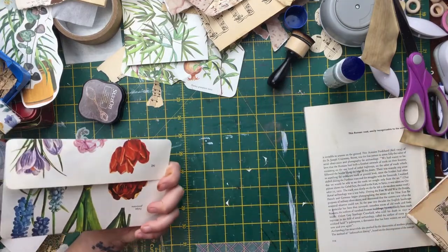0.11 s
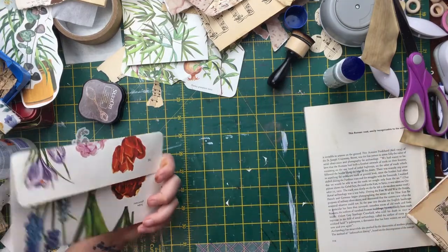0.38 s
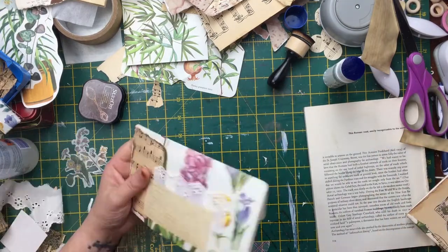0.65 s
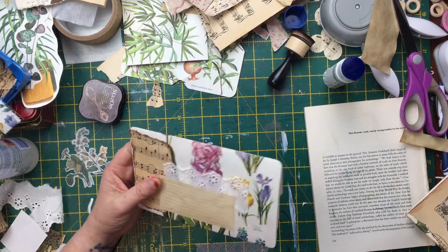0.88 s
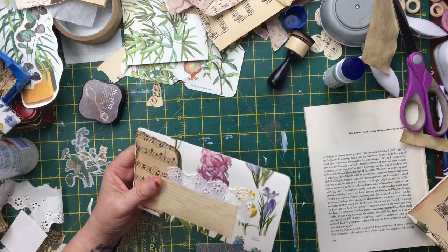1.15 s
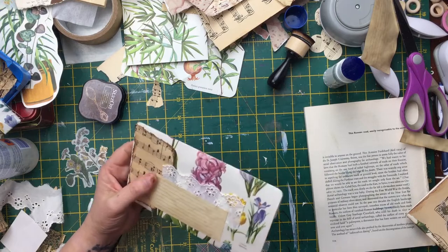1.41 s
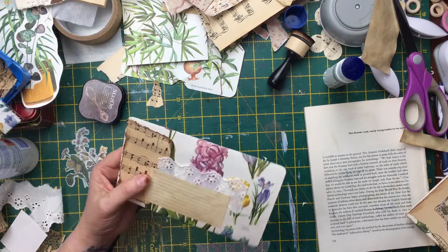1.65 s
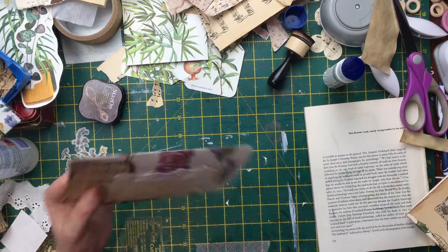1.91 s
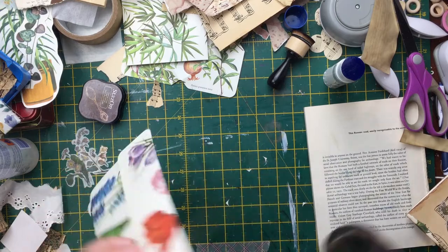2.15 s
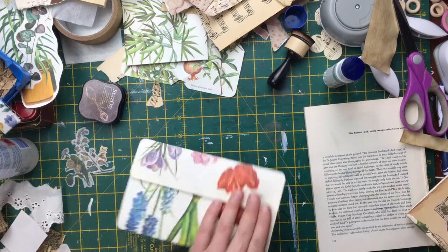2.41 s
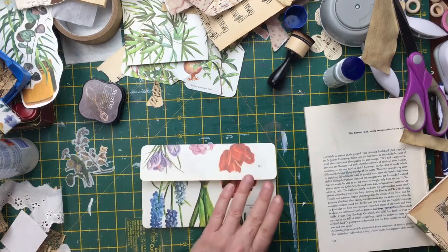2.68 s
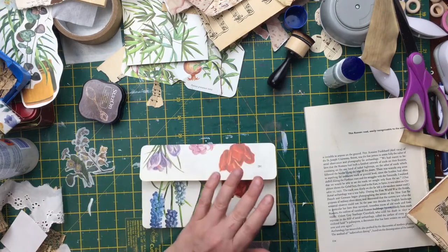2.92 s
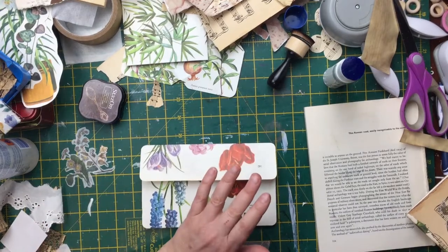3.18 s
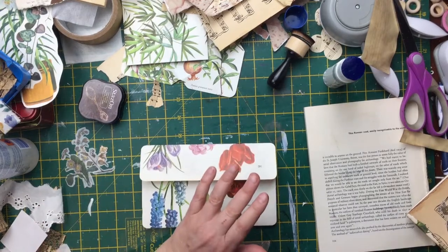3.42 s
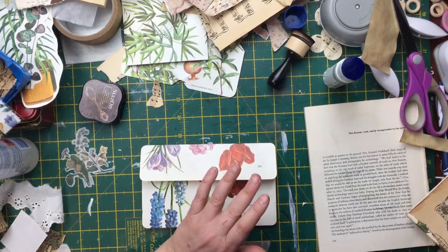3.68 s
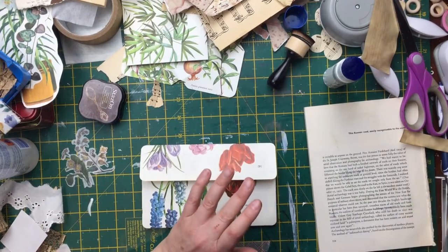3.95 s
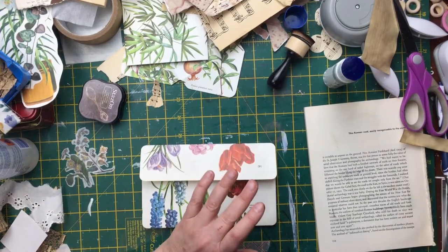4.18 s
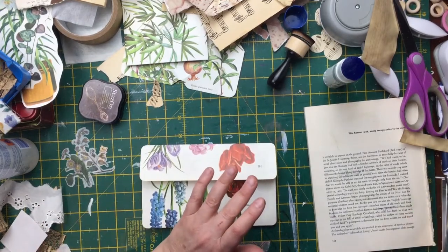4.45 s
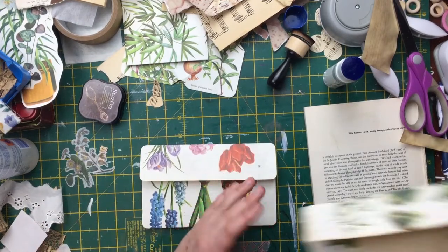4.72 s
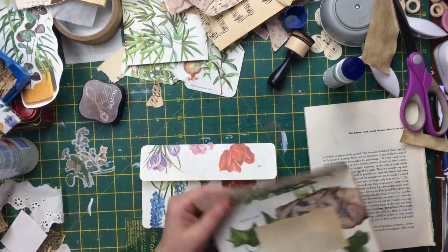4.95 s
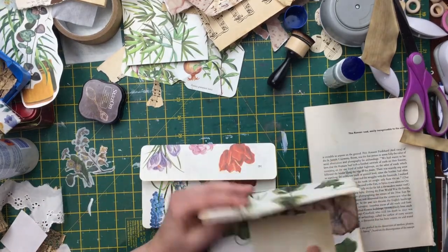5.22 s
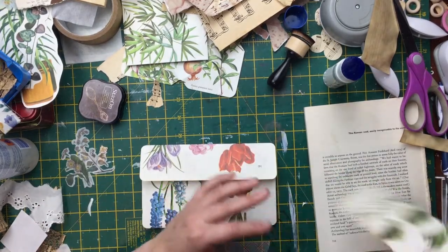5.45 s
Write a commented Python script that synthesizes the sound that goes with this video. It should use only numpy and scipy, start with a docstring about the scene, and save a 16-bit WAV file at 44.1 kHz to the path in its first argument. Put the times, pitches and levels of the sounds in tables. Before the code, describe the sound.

Close, soft rustles and dull pats of stiff card, a sharp table knock with faint clinking, then papery slaps and brisk shuffling.

```python
"""Quiet room air and a wavering mains hum, then stiff paper envelopes turned, laid down and picked up.
The microphone is just above a table with a cutting mat: sliding paper is shaped noise, snaps ring the sheet.
A hard object knocks on the table top, pushing its modes, and small metal parts clink as decaying modes.
Close sounds lose their highest treble and leave a short diffuse room tail."""
import sys
import numpy as np
from scipy import signal
from scipy.fft import rfft, irfft, next_fast_len
from scipy.io import wavfile
from scipy.ndimage import uniform_filter1d

SR = 44100
rng = np.random.default_rng(int(sys.argv[2]) if len(sys.argv) > 2 else 0)


def dump(signal):
    """Clip the signal to [-1, 1] and save it as 16-bit WAV at the path in sys.argv[1]."""
    limited = np.clip(np.atleast_2d(signal).T, -1, 1)
    pcm = np.round(limited * 32767).astype(np.int16)
    wavfile.write(sys.argv[1], SR, pcm)


def how_loud(loudness_db):
    """Turn decibels into a plain amplitude multiplier (0 dB gives 1, 20 dB gives 10)."""
    steps = np.asarray(loudness_db, float) / 20
    return 10 ** steps


N = 246519  # samples
T = np.arange(N) / SR  # seconds


def level(x, db):
    """Scale to an rms level in dB."""
    return x * how_loud(db) / np.sqrt(np.mean(x ** 2))


def band(x, hz, q):
    """Resonant band-pass, gain 1 at the centre."""
    return signal.lfilter(*signal.iirpeak(hz, q, fs=SR), x)


def steep(x, hz, q):
    """The same resonance twice, for steeper sides."""
    return band(band(x, hz, q), hz, q)


def lowpass(x, order, hz):
    """Butterworth treble roll-off."""
    return signal.lfilter(*signal.butter(order, hz, fs=SR), x)


def decay(t, t60):
    """Exponential fade, 60 dB down after t60 seconds."""
    return np.exp(-np.log(1000) * t / t60)


def linger(x, seconds):
    """Let each push die away exponentially with this time constant."""
    return signal.lfilter([1], [1, -np.exp(-1 / (seconds * SR))], x)


def ring(push, hz, t60):
    """One decaying mode, set off by a push."""
    pole = np.exp((2j * np.pi * hz - np.log(1000) / t60) / SR)
    return signal.lfilter([1], [1, -pole], push).imag


def walk(rate):
    """Random levels held 1 / rate seconds and slewed twice; spread near 1."""
    hold = int(SR / rate)
    steps = np.repeat(rng.standard_normal(N // hold + 1), hold)
    return 2.17 * uniform_filter1d(uniform_filter1d(steps, hold), hold)[:N]


def grit(per_s, spread_db):
    """Noise roughened by fibres catching: many tiny clicks, a few of them larger."""
    size = how_loud(spread_db * np.minimum(rng.exponential(size=N), 3))
    clicks = (rng.random(N) < per_s / SR) * size
    return level(rng.standard_normal(N) * (1 + 15 * uniform_filter1d(clicks, size=60)), 0)


# Colour of the room air and microphone hiss. Each row: frequency in Hz, relative density in dB per Hz.
AIR_COLOUR = [(12, -23.5), (20, 5.5), (123, -9), (141, -11.5), (176, -10), (208, -12), (316, -13),
              (344, -17.5), (467, -20), (1240, -26.5), (1430, -27.5), (2860, -33), (15700, -39)]
AIR_DB, HUM_DB, HUM_HZ = -64, -71.5, 119.4  # rms levels; the hum wavers around its own


def air():
    """Steady coloured noise under a hum that wavers in level and phase."""
    size = next_fast_len(N)
    hz, db = np.transpose(AIR_COLOUR)
    bins_hz = np.arange(size // 2 + 1) * SR / size
    colour = how_loud(np.interp(np.log(bins_hz + 1), np.log(hz), db))
    noise = irfft(rfft(rng.standard_normal(size)) * colour, size)[:N]
    hum_level = np.sqrt(2) * how_loud(HUM_DB + 1.3 * walk(12))
    hum = hum_level * np.sin(2 * np.pi * HUM_HZ * T + 0.78 * walk(14))
    return level(noise, AIR_DB) + hum


# How fast the room falls silent. Each row: frequency in Hz, t60 in seconds.
ROOM_DECAY = [(125, 0.3315), (500, 0.569), (2000, 0.43), (8000, 0.32)]
ROOM_DB = -20.5  # energy of the tail's impulse response


def room(x):
    """Diffuse noise tail, each octave fading at its own pace."""
    t, (hz, t60) = T[:SR // 2], np.transpose(ROOM_DECAY)
    tail = 0
    for centre in 90 * 2 ** np.arange(8):
        octave_t60 = np.interp(np.log(centre), np.log(hz), t60)
        tail = tail + band(rng.standard_normal(len(t)), centre, 2.7) * decay(t, octave_t60)
    tail = tail * np.clip(t / 0.0075, 0, 1)  # first reflections need a few ms
    return signal.fftconvolve(x, how_loud(ROOM_DB) * tail / np.sqrt(np.sum(tail ** 2)))[:N]


# Blows on the table, which also shake the metal. Each row: start in seconds, relative push on the table in dB,
# contact in ms, lowest frequency in Hz the object's weight can move, relative push on the metal in dB.
BLOWS = [(3.038, -12.5, 0.58, 50.7, -93), (3.197, -47, 1, 303, -99), (3.252, -72, 0.53, 300, -68),
         (3.2619, -29, 1, 252, -34.5), (3.268, -29.5, 1.2, 245, -45), (3.273, -37, 0.95, 250, -72),
         (3.281, -46, 1.48, 250, -78.5), (3.3778, -24, 2.83, 149, -58.5), (3.392, -26.5, 1.62, 298, -87.5),
         (3.397, -32, 1.12, 304, -95), (3.411, -29, 2.1, 300, -95), (3.4276, -22.5, 1.1, 336, -32),
         (3.44, -24.5, 1.1, 343, -35), (3.461, -35, 2, 300, -36.5), (3.502, -43.5, 0.36, 300, -44),
         (3.508, -36, 0.89, 296, -46.5), (3.641, -49, 0.82, 350, -90)]
# Distinct modes of the table top. Each row: frequency in Hz, relative level in dB, t60 in seconds.
TABLE_MODES = [(84.7, -29.5, 0.15), (134.7, -16.5, 0.288), (187.43, -24, 0.22), (288, -8.5, 0.094),
               (396.3, -24.5, 0.092), (542.4, -7.5, 0.12), (616, -1, 0.098), (662, -9, 0.1312),
               (822, -3, 0.033), (980, -2, 0.017), (1220, -2.5, 0.024), (1510, 6.5, 0.016),
               (1618, -17.5, 0.0552), (1940, -12, 0.0359), (2400, -12.5, 0.026)]
# Its dense small modes, by octave. Each row: centre in Hz, relative level in dB, t60 in seconds.
DENSE_MODES = [(44.2, -5, 0.1486), (89, -4.5, 0.21), (186.7, -8, 0.36), (345, 1, 0.26), (670.8, 6.5, 0.21),
               (1410, -11, 0.2564), (2880, -16.5, 0.136), (5760, -21, 0.078)]


def table():
    """Rounded pushes: a long contact leaves out the upper modes; each moves little below its lowest frequency."""
    push, t = np.zeros(N), T[:SR // 2]
    for start, db, contact_ms, lowest_hz, _ in BLOWS:
        # start between samples; the push peaks a third of the way into the contact
        phase = np.clip(T[:4000] - start % (1 / SR), 0, 1) / (contact_ms / 6000)
        shape = phase ** 2 * np.exp(-phase)
        shape = signal.lfilter(*signal.butter(2, lowest_hz, "high", fs=SR), shape / shape.sum())
        at = int(start * SR)
        push[at:at + 4000] -= how_loud(db) * shape
    modes = sum(how_loud(db) * ring(push, hz, t60) for hz, db, t60 in TABLE_MODES)
    response = 0
    for hz, db, t60 in DENSE_MODES:
        octave = level(steep(rng.standard_normal(len(t)), hz, 1.0), 0)
        response = response + how_loud(db) * octave * decay(t, t60)
    dense = signal.fftconvolve(push, response * np.clip(t / 0.0026, 0, 1))[:N]
    # the surfaces tick as they meet
    tick = steep(linger(abs(push), .003) * rng.standard_normal(N), 6840, 0.68)
    thud = steep(push, 600, 2.33)
    return how_loud(-39.5) * tick + how_loud(-4) * modes + how_loud(-18) * dense + how_loud(23) * thud


# Modes of the small metal parts. Each row: frequency in Hz, relative level in dB, t60 in seconds.
METAL_MODES = [(1452, -18, .3), (1905, -16, .2), (2373, -8, 0.047), (3265, -14.5, 0.35), (3464, -14, 0.38),
               (3450, -9.5, 0.37), (3715, -5, 0.054), (4066, -15, 0.426), (4540, -25, .15),
               (4865, -6.5, 0.23), (4960, -0.5, 0.16), (5830, -6.5, .14), (5800, -10, 0.32),
               (6393, -6, 0.14), (6126, -3, 0.21), (6450, 0.5, 0.16), (6370, -6, 0.11), (6997, -10, 0.19),
               (7590, -11, 0.093), (8350, -6.5, 0.187), (9400, -6.5, .13), (9430, -11, 0.11),
               (9890, -9, .12), (10280, -2, 0.052), (10570, -7, 0.081), (11500, -20.5, 0.12),
               (12020, -1.5, .08), (13440, -20.5, .14), (14300, -18, 0.11), (15320, -20, .16)]
TWIN = 1.003  # frequency ratio of each mode's fast-dying twin


def metal():
    """Every clink lands elsewhere, so the modes share its energy anew; loose parts chatter on for a moment."""
    start = int(BLOWS[0][0] * SR)
    at = [int(row[0] * SR) - start for row in BLOWS]
    size = how_loud(np.array(BLOWS)[:, -1])
    share = rng.standard_normal((len(BLOWS), len(METAL_MODES)))
    push = np.zeros(SR)  # one second from the first blow
    push[at] = size
    chatter = linger(push, 0.013) * (rng.random(SR) < 1800 / SR)
    clinks = 0
    for k, (hz, db, t60) in enumerate(METAL_MODES):
        hits = how_loud(-6) * chatter * rng.standard_normal(SR)
        hits[at] = size * how_loud(4.3 * share[:, k])
        clinks = clinks + how_loud(db - 22.5) * ring(hits, hz, t60)
        # most of the energy dies fast where the pieces touch
        clinks = clinks + how_loud(db - 11.5) * ring(hits, hz * TWIN, t60 * 0.32)
    crack = steep(linger(push, 0.004) * rng.standard_normal(SR), 6500, 0.61)
    rattle = steep(chatter * rng.standard_normal(SR), 6000, 0.5)
    clatter = lowpass(how_loud(-0.5) * crack + how_loud(-15) * rattle, 4, 11500)
    return np.pad(clinks + clatter, (start, N - start - SR))


# Strokes of paper sliding on fingers and mat. Each row: start in seconds, length in seconds,
# relative hiss level in dB, centre of the hiss in Hz, relative level of the sheet's flexing in dB.
STROKES = [(0.376, 0.36, -62, 7800, -70.5), (0.707, 0.036, -60, 5630, -63), (0.735, .11, -66.5, 7900, -68),
           (1.153, .14, -78, 5836, -92.5), (1.33, 0.26, -72.5, 5540, -79), (1.556, 0.23, -68, 5720, -74),
           (1.74, 0.0984, -67.5, 7200, -73), (1.899, .15, -69, 6240, -72), (2.016, .14, -64.5, 7950, -71.5),
           (2.156, 0.132, -67.5, 7200, -73.5), (2.291, 0.056, -67.5, 6860, -83),
           (2.346, 0.27, -71, 4160, -75.5), (2.552, 0.0609, -59, 7620, -53),
           (2.626, 0.045, -72, 6600, -61.5), (3.678, 0.078, -76, 6600, -64),
           (3.725, 0.14, -63.5, 8300, -58), (3.848, .04, -62, 9000, -59.5),
           (3.866, 0.1503, -57.5, 6900, -55.5), (4.001, 0.1082, -63, 5560, -55.5),
           (4.282, 0.19, -72, 7230, -70.5), (4.889, 0.064, -57.5, 8120, -60), (4.986, .1, -61.5, 6250, -69),
           (5.084, 0.075, -70, 5200, -69), (5.153, .08, -67.5, 5930, -62.5),
           (5.222, 0.1, -61.5, 7500, -61.5), (5.289, .1, -55.5, 7700, -60.5), (5.381, .07, -65, 7500, -67),
           (5.424, .07, -63.5, 6600, -58), (5.504, 0.048, -62, 5800, -65.5), (5.55, .07, -67, 6600, -74)]
PEAK_SHARE, SWELL, SETTLE_S = .55, 1.317, .014  # where a stroke is fastest; pointedness; dying away
HELD_HISS_DB, HELD_FLEX_DB = -87, -76  # relative as above: the sheet is never quite still
FLEX_HZ, FLEX_OCTAVES_PER_DB = 400, .036  # harder flexing crinkles higher


def sliding():
    """Each stroke speeds up, slows down and settles; its speed drives hiss and flexing alike."""
    start, length, hiss_db, hz, flex_db = np.transpose(STROKES)[:, :, None]
    part = np.clip((T - start) / length, 0, 1)
    rise_and_fall = np.minimum(part / PEAK_SHARE, (1 - part) / (1 - PEAK_SHARE))
    speed = np.sin(np.pi / 2 * rise_and_fall) ** (2 * SWELL)
    keep = np.exp(-1 / (SETTLE_S * SR))
    speed = np.maximum(speed, signal.lfilter([1 - keep], [1, -keep], speed))
    # powers add; the hiss centre is their weighted mean
    hiss = how_loud(2 * hiss_db) * speed + how_loud(2 * HELD_HISS_DB) / len(STROKES)
    hiss_power = hiss.sum(axis=0)
    hiss_hz = (hiss * hz).sum(axis=0) / hiss_power
    flex = 10 * np.log10((how_loud(2 * flex_db) * speed).sum(axis=0) + how_loud(2 * HELD_FLEX_DB))
    flex_hz = FLEX_HZ * 2 ** (FLEX_OCTAVES_PER_DB * (flex - HELD_FLEX_DB))
    return 10 * np.log10(hiss_power), hiss_hz, flex, flex_hz


def rustle():
    """Sliding hisses in a patchy hump that follows the speed; the flexing sheet crinkles lower."""
    hiss_db, hiss_hz, flex_db, flex_hz = sliding()
    fibres, hiss, flex = grit(370, 3.0), 0, 0
    for hz in 2500 * 2 ** np.arange(0, 2.7, 1 / 5):
        hump_db = -12 * np.log2(hz / hiss_hz) ** 2 + 1.04 * walk(24)
        hiss = hiss + how_loud(hump_db) * steep(fibres, hz, 3.2) / np.sqrt(hz)
    creases = grit(150, 2.8)
    for hz in 200 * 2 ** np.arange(0, 4.4, 1 / 3):
        hump_db = -3 * np.log2(hz / flex_hz) ** 2 + 2.06 * walk(30)
        flex = flex + how_loud(hump_db) * steep(creases, hz, 2.66) / np.sqrt(hz)
    return how_loud(hiss_db) * level(hiss, -2.37) + how_loud(flex_db) * level(flex, -1.1)


# Paper snaps and pats. Each row: start in seconds, close-up peak in dB, sheet resonance in Hz,
# treble peak in dB relative to the body, relative strength of the scuff in dB.
SNAPS = [(0.552, -46, 604, 3, -7.5), (0.639, -53, 1000, -8, -17), (0.656, -48.5, 420, -1.5, 6),
         (0.719, -54, 1270, 3, 2), (0.781, -52, 426, -11, 12), (1.234, -56.5, 644, -15.5, -6),
         (1.441, -50, 640, 13, 4), (1.452, -55, 2760, 2.5, -1), (1.488, -43, 2815, 2, -17),
         (1.537, -42, 604, 10, -9), (1.737, -48.5, 930, 9, -2.5), (1.745, -49, 666, -23, -14),
         (1.997, -56, 2600, 2, -8), (2.254, -57, 2600, 10, 0), (2.346, -48.5, 616, 7.5, -1),
         (2.569, -35.5, 755, -4, -16.5), (2.575, -39.5, 1160, -13, -2), (2.588, -32, 760, -7.5, -9.5),
         (2.66, -50.5, 500, -25, -5), (2.747, -42.5, 880, -48, -14), (2.791, -42, 978, -43, -16),
         (2.819, -60.5, 1140, -24, 1.5), (2.848, -55, 885, -21, -13), (2.871, -51.5, 544, -22, -16),
         (2.961, -60, 570, -28, 1), (3.705, -60.5, 620, -9, -8.5), (3.752, -45, 623, -16, 8.5),
         (3.778, -46.5, 890, -13, 11), (3.881, -49, 1220, -18, 0), (3.908, -46, 694, 0.5, 4),
         (3.946, -40.5, 610, 2, 4), (4.025, -25, 860, -38.5, -15), (4.046, -41.5, 746, -1.5, -5),
         (4.222, -56.5, 705, -38, 7), (4.295, -66, 2600, 10, -8.5), (4.426, -57, 2600, 9.5, -10),
         (4.585, -53.5, 500, -18.5, -19), (4.897, -47.5, 889.5, -7, 9), (4.959, -34.5, 570, -24, 3),
         (4.963, -35, 723, -28, -24.5), (4.974, -21.5, 797, -24.5, -10), (5.214, -49, 698, -8, 5.5),
         (5.267, -39.5, 640, -15, 5), (5.326, -44, 2580, -1, 25), (5.369, -46, 626, -17.5, -10),
         (5.442, -49.5, 1263, -27.5, 7), (5.469, -47.5, 522, -10, -6), (5.517, -50, 1660, -4, 17)]
SCUFF_T60_S, SCUFF_DB_PER_DOUBLING = 0.081, 18.5  # t60 at scuff 0 dB; a stronger scuff drags on longer


def snaps():
    """A scuff of noise swells and fades; just after it starts a crack rings the sheet briefly."""
    size = 8192
    out, t, hiss_hz = np.zeros(N + size), T[:size], sliding()[1]
    crack_at = int(.0022 * SR)
    noises = rng.standard_normal((len(SNAPS), size))
    for (start, db, hz, treble_db, scuff_db), noise in zip(SNAPS, noises):
        at = int(start * SR)
        scuff_t60 = SCUFF_T60_S * 2 ** (scuff_db / SCUFF_DB_PER_DOUBLING)
        push = how_loud(scuff_db - 2.5) * noise * decay(t, scuff_t60) * np.clip(t / 0.0035, 0, 1)
        # the crack splinters for a millisecond or two
        push[crack_at:] += 0.4 * noise[crack_at:] * np.exp(-t[:-crack_at] / 0.00059)
        push[crack_at] = -1
        body = steep(push, hz, 0.51) + how_loud(2.0) * steep(push, hz, 4.8)
        body = lowpass(body, 3, 3300)  # the stiff sheet is dull
        edge = steep(push, hiss_hz[at], 0.9)
        sound = body / abs(body).max() + how_loud(treble_db) * edge / abs(edge).max()
        out[at:at + size] += how_loud(db) * sound / abs(sound).max()
    return out[:N]


def scene():
    """Hands and objects close to the microphone, their echo, and the room air."""
    near = rustle() + snaps() + table() + metal()
    near = lowpass(near, 3, 15100)  # the treble of near sounds rolls off
    return (near + room(near) + air())[None]


def band_limit(x):
    """A steep low-pass at the top of the band."""
    return signal.sosfilt(signal.butter(12, 16210, fs=SR, output="sos"), x)


def record(dry):
    """The top is cut off steeply above 15.7 kHz."""
    steep_cut = signal.ellip(8, .2, 60, 15700, fs=SR, output="sos")
    mix = signal.sosfilt(steep_cut, dry)
    return band_limit(mix)


dry = scene()
out = record(dry)
dump(out)
```